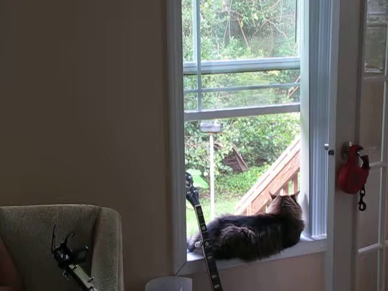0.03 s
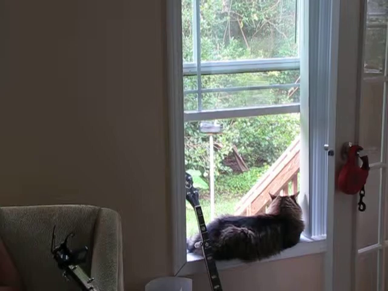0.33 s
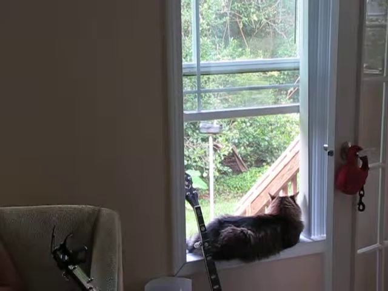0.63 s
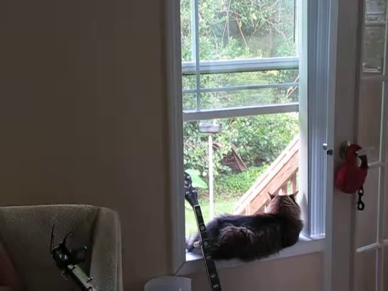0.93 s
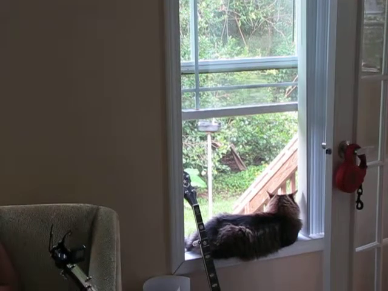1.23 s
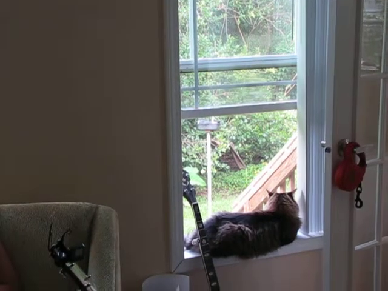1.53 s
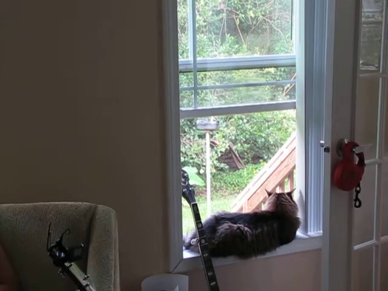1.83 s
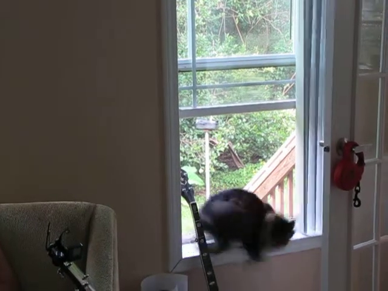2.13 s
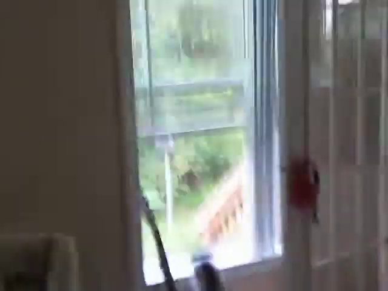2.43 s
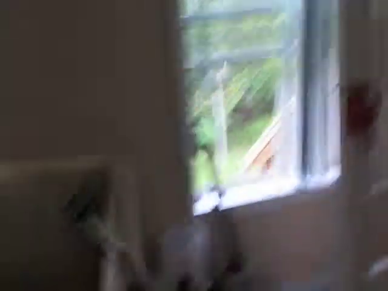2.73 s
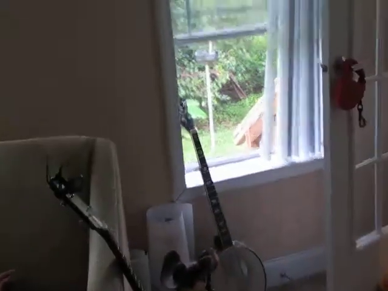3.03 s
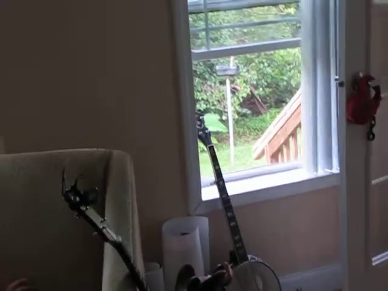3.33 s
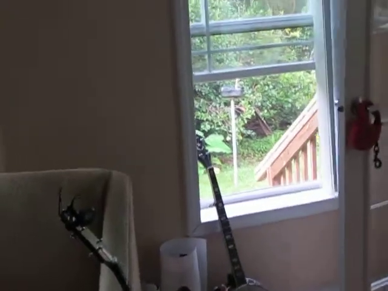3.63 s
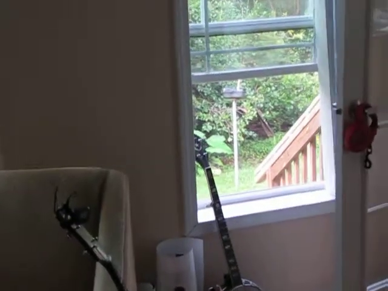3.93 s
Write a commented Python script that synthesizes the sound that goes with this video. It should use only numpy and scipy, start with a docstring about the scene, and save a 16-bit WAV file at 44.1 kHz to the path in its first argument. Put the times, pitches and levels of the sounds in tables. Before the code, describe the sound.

A loud double sonic boom breaks the quiet of a living room. A cat's claws scrabble off a window sill with bumps against furniture, the close camera snaps as it is jolted, and a deep rumble lingers.

```python
"""Sonic boom in a living room

Two shocks, under half a second apart, push on the air of a quiet room and set the house ringing.
A cat scrabbles off the window sill and lands among furniture while the rumble rolls away.
Small things tick and clink. A hand-held camera snaps as it is jolted, and its lens motor starts to hiss."""
import sys
import numpy as np
from scipy import signal
from scipy.fft import rfft, irfft
from scipy.io import wavfile

SR = 44100
rng = np.random.default_rng(int(sys.argv[2]) if len(sys.argv) > 2 else 0)


def digitize_waveform(pressure):
    """Quantize a signal to 16-bit integers and store it at the path in sys.argv[1].

    Rows of a 2-D input are taken as channels; values are limited to [-1, 1].
    """
    field = np.atleast_2d(pressure).T
    bounded = np.clip(field, -1, 1)
    quanta = np.round(bounded * 32767).astype(np.int16)
    wavfile.write(sys.argv[1], SR, quanta)


N = 176400
T = np.arange(N) / SR  # time [s]
F = np.maximum(np.fft.rfftfreq(N, 1 / SR), 1)  # frequency [Hz]

# the boom's front and rear shock (time [s], level [dB], extra level of its first push [dB])
SHOCKS = [(1.971, -0.5, 2.5), (2.4214, -1.3, -9)]


def undb(db):
    """Turn decibels into a number to multiply by."""
    return 10 ** (np.asarray(db) / 20)


def unit(x):
    """Scale a signal so that its average strength (rms) is 1."""
    return x / np.sqrt(np.mean(x ** 2))


def decay(t, t60):
    """A fade that starts at t = 0 and drops 60 dB in t60 seconds, the fade time."""
    return (t >= 0) * np.exp(-np.log(1000) * np.abs(t) / t60)


def colour(points):
    """Join (frequency [Hz], level [dB]) points into a gain for every frequency."""
    hz, db = np.array(points).T
    return undb(np.interp(np.log(F), np.log(hz), db))


def diffuse(gain, split_hz=2220):
    """Noise from all around at two close microphones: alike in the bass, different in the treble."""
    mid, side = rfft(rng.standard_normal((2, N)))
    side = side * F / np.hypot(F, split_hz)
    return unit(irfft(np.array([mid + side, mid - side]) * gain, N))


def convolve(x, response):
    """Give a sound the echoes of a room."""
    return signal.fftconvolve(np.atleast_2d(x), np.atleast_2d(response), axes=-1)[:, :N]


def ring(modes, t):
    """A struck object rings with fading tones, its modes (pitch [Hz], level [dB], fade time [s])."""
    return sum(undb(db) * np.sin(2 * np.pi * hz * t) * decay(t, t60) for hz, db, t60 in modes)


def add(out, start, sound):
    """Mix a sound in at a start time in seconds."""
    i = int(start * SR)
    n = min(N - i, sound.shape[-1])
    out[..., i:i + n] += sound[..., :n]


def place(x, pan_db, lag_s):
    """Make the left side louder and later than the right; negative values do the opposite."""
    lean = np.array([[.5], [-.5]])
    delay = np.exp(-2j * np.pi * F * lag_s * lean)
    return irfft(rfft(x) * delay, N) * undb(pan_db * lean)


def burst(hz, width, t60):
    """Fading noise around one pitch; a larger width makes the pitch less clear."""
    fade = decay(T[:SR // 4], t60)
    noise = rng.standard_normal(len(fade)) * fade
    b, a = signal.iirpeak(hz, 1 / width, fs=SR)
    tap = signal.lfilter(b, a, signal.lfilter(b, a, noise))
    return unit(tap) * np.sqrt(np.mean(fade ** 2))


def taps(rows, reverb, width, room_db):
    """Each touch is a short burst at the pitch of the thing touched, followed by the room's echo."""
    out = np.zeros(N)
    for start, db, hz, t60 in rows:
        add(out, start, undb(db) * burst(hz, width, t60))
    return out + undb(room_db) * convolve(out, reverb)


def room():
    """The living room's echoes blur into a tail whose treble fades first."""
    low = 1 / (1 + (F / 3000) ** 2)
    bass = 0.44 * diffuse(low) * decay(T - .006, t60=0.41)
    treble = diffuse(1 - low) * decay(T - .006, t60=0.23)
    return unit(bass + treble) / np.sqrt(N)


def room_air():
    """The air of the room makes a soft, steady, low noise."""
    # tone of the air (frequency [Hz], level [dB])
    air_tone = [(12, -34), (20, 6), (38, -6.5), (101, -0.5), (140, -12), (171, -6.5), (238, -7.5),
                (289, -15.5), (324, -10), (404, -16.5), (705, -19.5), (1300, -27), (4800, -37), (9000, -45),
                (15500, -54)]
    return undb(-41) * diffuse(colour(air_tone))


def lens_motor(hz=9300, width_hz=1000, start_s=3.05, rise_s=0.42):
    """The camera's lens motor fades in as a thin hiss around one high pitch."""
    resonance = 1 / (1 + 1j * (F / hz - hz / F) * hz / width_hz)
    fade_in = np.clip((T - start_s) / rise_s, 0, 1)
    return undb(-67) * diffuse(resonance ** 2) * fade_in


def ticks(reverb):
    """Small things in the room tick and creak faintly."""
    # ticks and creaks (time [s], level [dB], pitch [Hz], fade time [s])
    creaks = [(.549, -52, 3400, 0.068), (.728, -53, 5960, .025), (3.70, -47, 1950, 0.07)]
    return taps(creaks, reverb, width=0.31, room_db=-3)


def clinks(reverb):
    """Small hard things touch, then ring with two close tones that waver and a higher overtone."""
    # clinks (time [s], level [dB], pitch [Hz], overtone [Hz], overtone level [dB], fade time [s])
    touches = [(.277, -42.5, 1434, 2950, 0, .11), (1.569, -43, 1008, 2900, -11, 0.23),
               (3.248, -40.5, 3816, 7000, -12, 0.081), (3.867, -43, 3850, 6950, -12, 0.048)]
    out = np.zeros(N)
    for start, db, hz, over_hz, over_db, t60 in touches:
        modes = [(hz, 0, t60), (hz * 1.043, -3, t60 * 0.55), (over_hz, over_db, t60 * 0.57)]
        contact = undb(-6) * burst(hz=2980, width=0.85, t60=0.089)
        add(out, start, undb(db) * (ring(modes, T[:SR // 4]) + contact))
    return out + undb(-7) * convolve(out, reverb)


def camera_clicks(reverb):
    """The jolted camera snaps sharply, close to its left microphone."""
    # snaps of the camera body (time [s], level [dB], pitch [Hz])
    snaps = [(2.364, -10.5, 2770), (2.4715, -12.5, 3550), (3.489, -30.5, 4100)]
    out = np.zeros(N)
    for start, db, hz in snaps:
        body = burst(hz, width=0.44, t60=0.0062)
        edge = undb(-7) * burst(hz=5500, width=0.86, t60=0.0031)
        add(out, start, undb(db) * (body + edge))
    return place(out, pan_db=7, lag_s=-75e-6) + undb(-24) * convolve(out, reverb)


def knocks(reverb):
    """Paws, furniture and the camera body bump, each with only a rough pitch."""
    # bumps (time [s], level [dB], pitch [Hz], fade time [s])
    bumps = [(1.985, -22.5, 2380, 0.011), (2.264, -33, 1010, 0.07), (2.305, -30.5, 1180, 0.042),
             (2.366, -20, 850, 0.044), (2.376, -20.5, 246, 0.046), (2.41, -24, 850, 0.019),
             (2.432, -13, 139, 0.074), (2.434, -25, 1490, 0.066), (2.445, -25.5, 670, 0.15),
             (2.586, -30.5, 1680, 0.11), (2.59, -27, 306, 0.051), (2.635, -43, 503, 0.14),
             (2.711, -32, 1710, 0.076), (2.766, -18.5, 457, 0.034), (2.815, -40.5, 1040, 0.23),
             (2.994, -18.5, 160, 0.14), (2.998, -56, 513, 0.043), (3.028, -23, 162, 0.052),
             (3.14, -26, 88, 0.19), (3.148, -31, 397, 0.19), (3.17, -41, 1090, 0.087)]
    return taps(bumps, reverb, width=0.59, room_db=-7.5)


def claws():
    """Claws make runs of uneven clicks; each run hits a new spot, so its ringing and echoes change."""
    # scratches and rattles (time [s], level [dB], half length [s], brightness [dB per octave])
    scrapes = [(1.974, -32, 0.0009, 2), (1.996, -28.5, 0.0022, -2.5), (2.023, -37, .001, 2),
               (2.029, -39, 0.0013, 2), (2.09, -37, 0.0075, -1), (2.18, -42, 0.0078, -5),
               (2.259, -28.5, .0012, 1), (2.272, -33, 0.0069, 0), (2.309, -26.5, 0.0029, 2.5),
               (2.325, -28, 0.0053, -1.5), (2.351, -15.5, 0.0054, 0.5), (2.374, -39, 0.0082, -7),
               (2.392, -35.5, 0.0061, 1), (2.409, -31, 0.00084, 3), (2.5321, -11.5, 0.0032, 1),
               (2.558, -42, 0.0079, -12), (2.608, -22, 0.0039, 1), (2.629, -33, 0.005, -1),
               (2.646, -29.5, 0.0027, -1), (2.715, -34, 0.0036, 1), (2.736, -34.5, 0.0033, -6.5),
               (2.782, -40.5, 0.014, -5.5), (2.829, -40, 0.015, -4.5), (3.141, -42, 0.0037, -1)]
    # tone of the scratching hiss (frequency [Hz], level [dB])
    hiss_tone = [(200, -51), (700, -7), (1300, -12), (2000, -8), (4500, -3.5), (7000, -4.5), (10000, -11),
                 (16000, -27.5)]
    # ringing of the window sill (pitch [Hz], level [dB], fade time [s])
    sill_modes = [(1755, 0, 0.055), (1876, 6.5, 0.036), (2508, 5.5, 0.021), (2674, 5, 0.022),
                  (3390, 5.5, 0.03), (3715, 6, 0.025), (4370, -1, .012), (4680, 11, 0.021),
                  (5370, -3, 0.012), (6630, -4.5, 0.0097), (7500, -3, 0.022), (8900, -6, 0.0084)]
    size = 8192  # samples in one run
    t, hz = T[:size], np.maximum(np.fft.rfftfreq(size, 1 / SR), 1)
    middle = t[size // 3]
    hiss = undb(-5) * np.interp(hz, F, unit(colour(hiss_tone)))
    octaves = np.log2(np.maximum(hz, 1000) / 4000)
    out = np.zeros((2, N))
    for at, db, half_s, tilt_db in scrapes:
        chance = rng.standard_normal((len(sill_modes), 2))
        modes = [(pitch * (1 + .01 * detune), level + 3 * swing, t60)
                 for (pitch, level, t60), (detune, swing) in zip(sill_modes, chance)]
        sill = undb(-6) * rfft(unit(ring(modes, t))) / np.sqrt(size)
        effort = np.exp(-((t - middle) / half_s) ** 2 / 2)
        roughness = undb(6.5 * rng.standard_normal(size))
        grains = roughness * (rng.standard_normal(size) + 0.45 * rng.standard_normal((2, size)))
        clicks = undb(db) * unit(effort * grains) * np.sqrt(np.mean(effort ** 2))
        near = irfft(rfft(clicks) * (hiss + 1j * sill) * undb(tilt_db * octaves))
        echo = undb(-6.5) * convolve(near.mean(0), room()[:, :SR // 2])
        add(out, at - middle, near)
        add(out, at - middle, echo)
    return place(out, pan_db=-0.5, lag_s=0)


def shudder_and_rumble():
    """After the first shock a deep shudder lingers, while the rumble above it rolls and fades."""
    # the boom rolling away (time [s], shudder level [dB], rumble level [dB])
    roll = [(1.97, -36, -43), (2.02, -16, -33.5), (2.3, -22, -35.5), (2.6, -18.5, -30), (2.9, -22, -37),
            (3.12, -21.5, -38), (3.298, -28.5, -37), (3.6, -19, -38.5), (4.0, -23.5, -41)]
    # tone of the deep shudder (frequency [Hz], level [dB])
    shudder_tone = [(6, 7.5), (13, 7.5), (24, 2.5), (35, 9.5), (45, -8.5), (70, -18), (150, -94)]
    # tone of the rumble (frequency [Hz], level [dB])
    rumble_tone = [(30, -5.5), (85, 7.5), (180, -3.5), (400, -8), (800, -18.5), (1600, -25.5), (4000, -32),
                   (8000, -43), (16000, -78)]
    times, shudder_db, rumble_db = np.array(roll).T
    shudder = diffuse(colour(shudder_tone)) * undb(np.interp(T, times, shudder_db))
    rumble = diffuse(colour(rumble_tone)) * undb(np.interp(T, times, rumble_db))
    fade_in = np.clip((T - SHOCKS[0][0]) / 0.04, 0, 1)
    return (shudder + rumble) * fade_in


def boom(push_s=0.0069, house_lag_s=0.00809, early_peak_s=0.021, early_width_s=0.014):
    """Each shock pushes the air in, sets the house ringing and scatters into the same echoes."""
    # ringing of the walls and the room's air (pitch [Hz], level [dB], fade time [s])
    house_modes = [(29.8, -9.5, 0.26), (108.9, -11, 0.29), (127, -15.5, 0.11), (222, -30, 0.24),
                   (243.7, -13, 0.22), (274, -10.5, 0.13), (337, -25, 0.5), (475, -46, 0.29),
                   (594, -29.5, 0.13)]
    # tone of the first echoes from walls and panes (frequency [Hz], level [dB])
    early_tone = [(50, -1.5), (110, -1), (240, -2.5), (400, -11.5), (800, -19), (1500, -24.5), (3000, -33),
                  (6000, -43), (10000, -61), (16000, -72)]
    # tone of the echoes that linger (frequency [Hz], level [dB])
    tail_tone = [(50, -1), (110, 5), (250, 0), (500, -12), (1000, -12.5), (2000, -19), (4500, -28.5),
                 (8000, -38), (16000, -59)]
    push = -undb(1) * np.sin(np.pi * np.minimum(T / push_s, 1)) ** 1.9
    house = -ring(house_modes, T - house_lag_s)
    swell = np.exp(-((T - early_peak_s) / early_width_s) ** 2 / 2)
    early = undb(-10.5) * diffuse(colour(early_tone)) * swell
    tail = undb(-20.5) * diffuse(colour(tail_tone)) * decay(T, t60=0.82)
    echoes = (early + tail) * np.minimum(T / 0.017, 1) ** 2
    out = np.zeros((2, N))
    for start, db, push_db in SHOCKS:
        add(out, start, undb(db) * (undb(push_db) * push + house + echoes))
    return out


def scene():
    """Mix the boom, the cat and the small noises in one room."""
    reverb = room()
    contacts = knocks(reverb) + ticks(reverb) + clinks(reverb)
    mix = boom() + shudder_and_rumble() + claws() + contacts + lens_motor() + room_air()
    # sound from the window side reaches the left microphone a little later
    return place(mix, pan_db=1.4, lag_s=3e-5) + camera_clicks(reverb)


def record(dry, start_s=0.071, top_hz=16100):
    """The microphones switch on, overload on the shocks and lose the highest treble."""
    clipped = np.clip(dry * (T > start_s), -1, 1)
    treble_cut = signal.ellip(10, .1, 80, top_hz, fs=SR, output="sos")
    return signal.sosfilt(treble_cut, clipped)


dry = scene()
out = record(dry)
digitize_waveform(out)
```